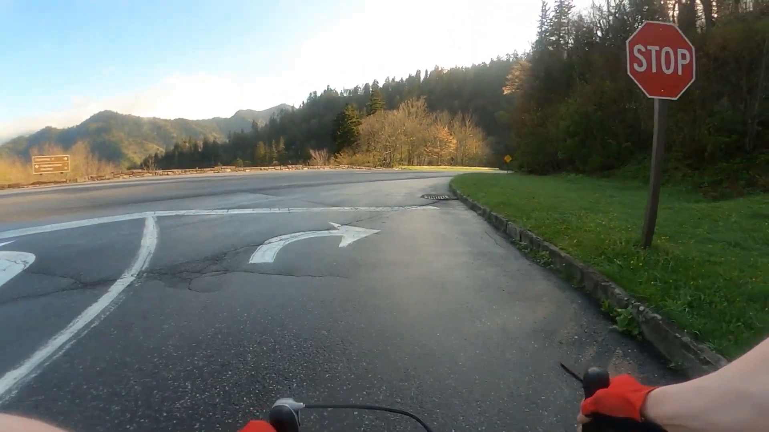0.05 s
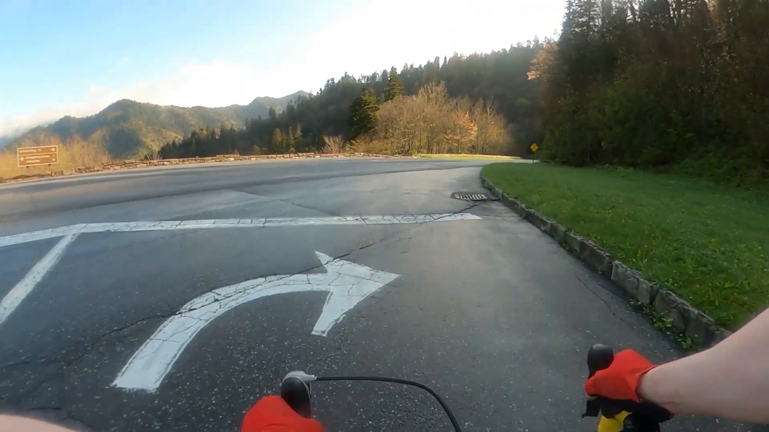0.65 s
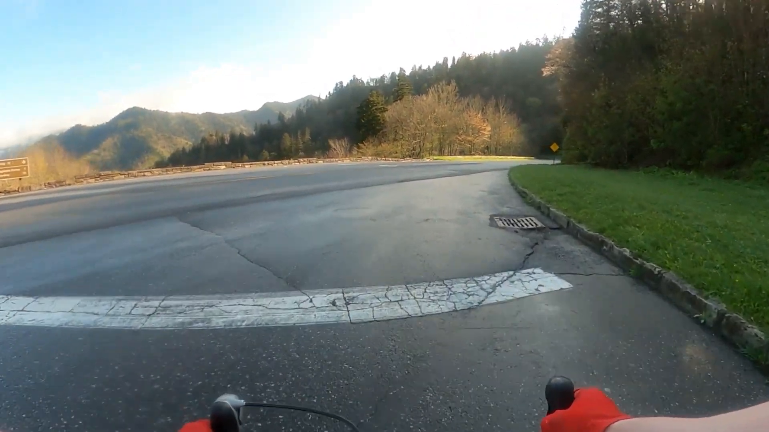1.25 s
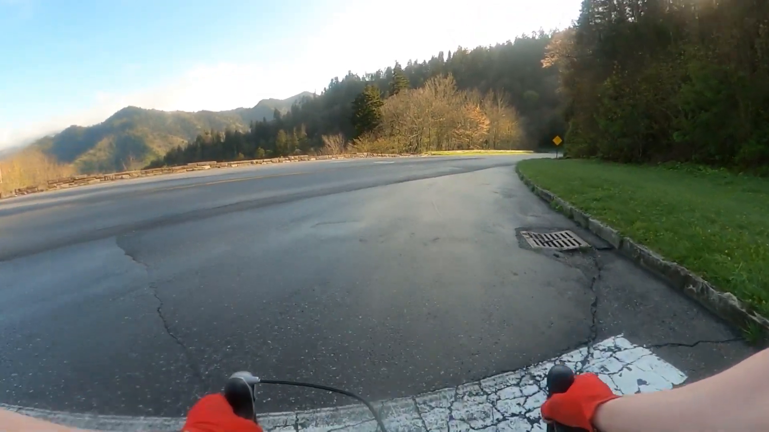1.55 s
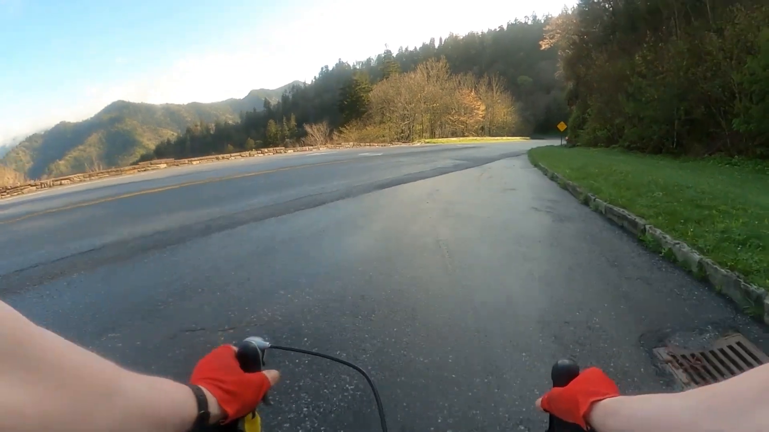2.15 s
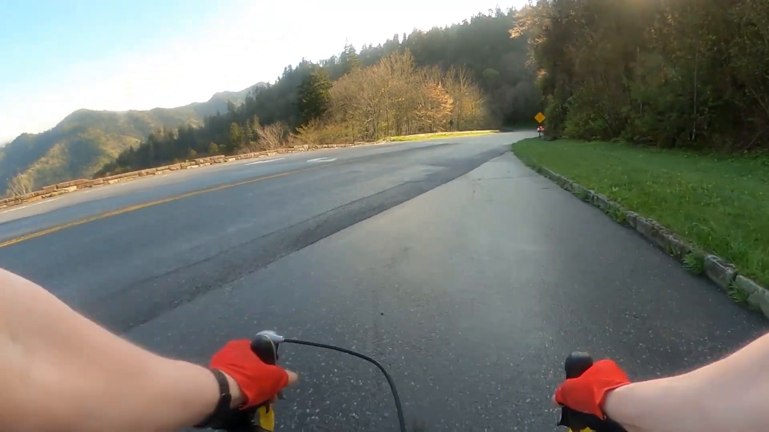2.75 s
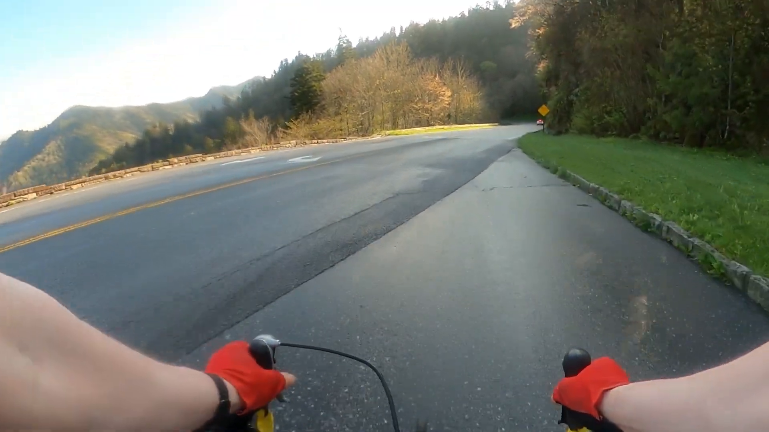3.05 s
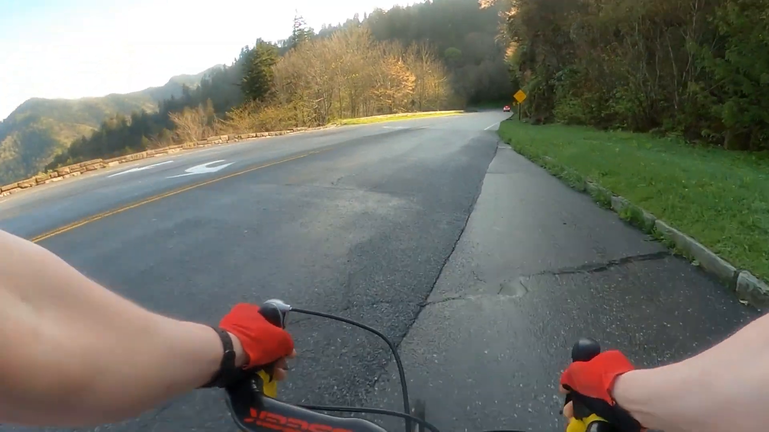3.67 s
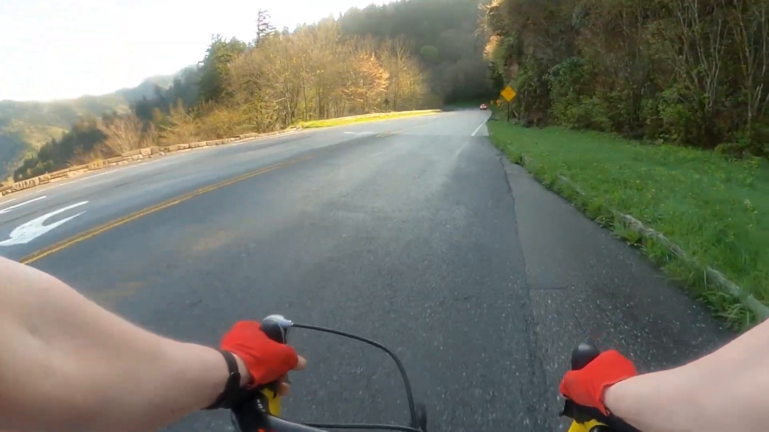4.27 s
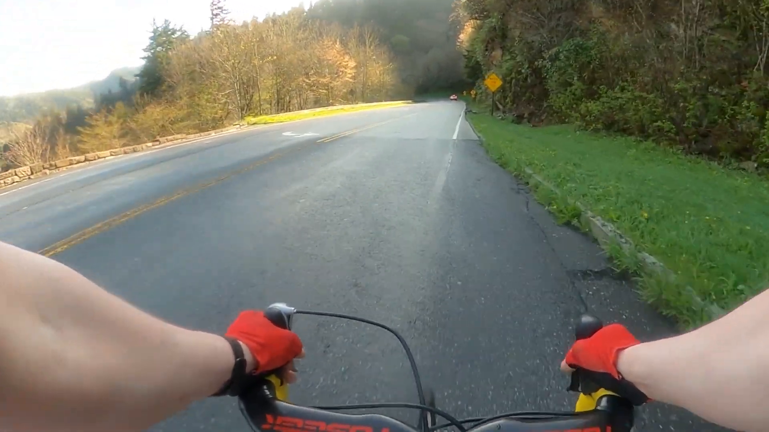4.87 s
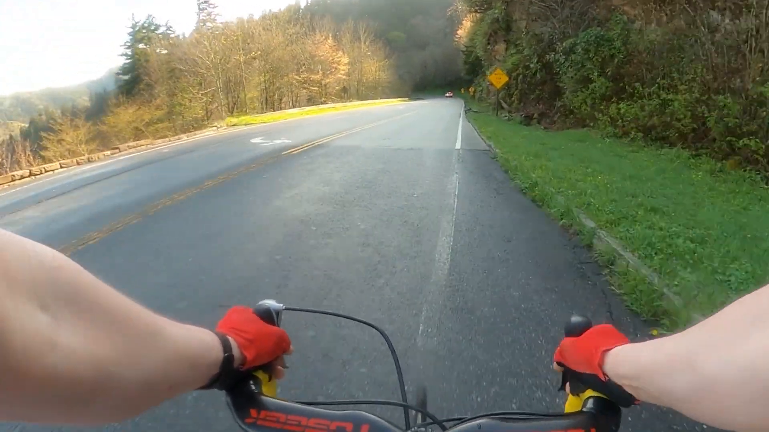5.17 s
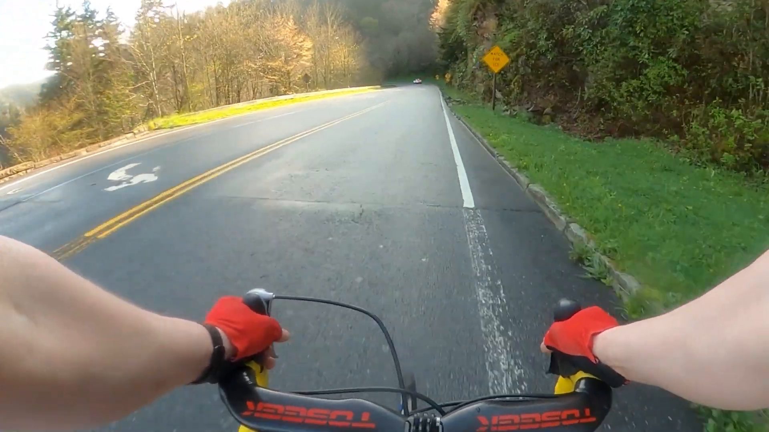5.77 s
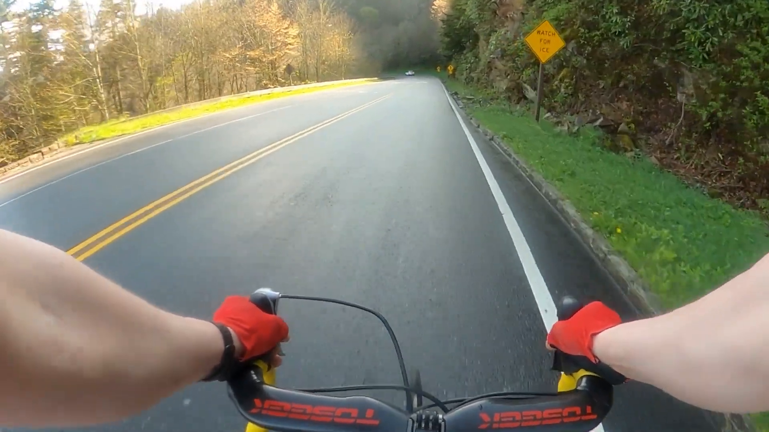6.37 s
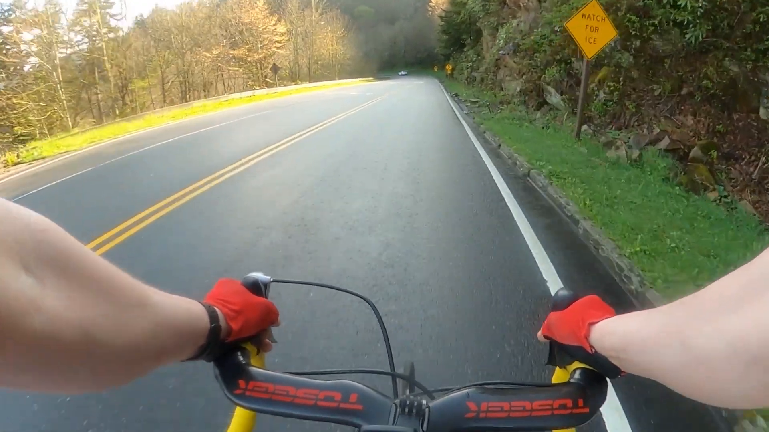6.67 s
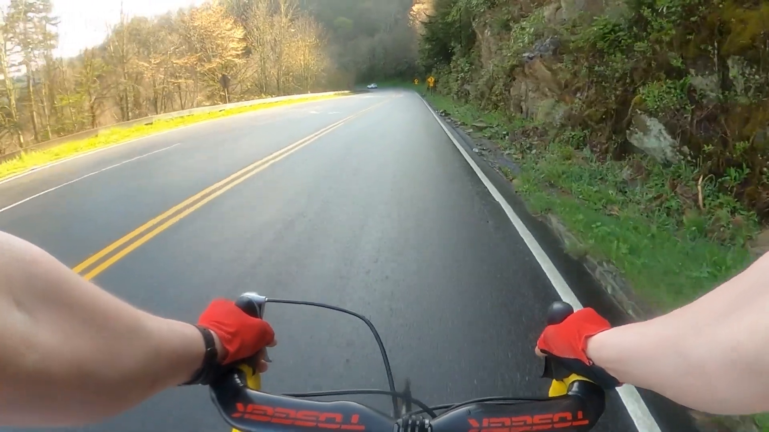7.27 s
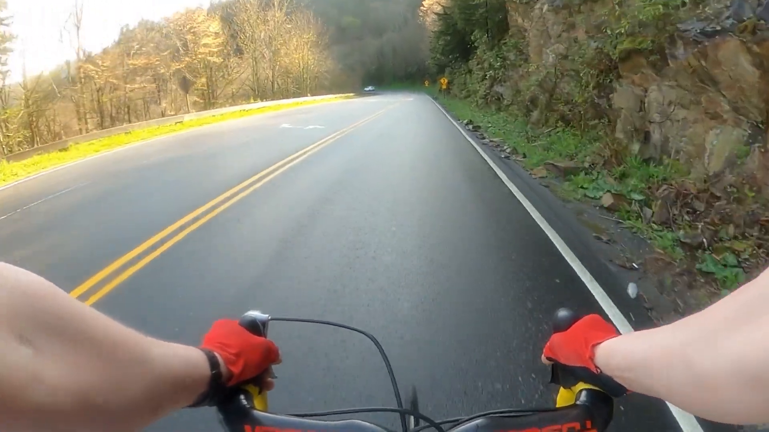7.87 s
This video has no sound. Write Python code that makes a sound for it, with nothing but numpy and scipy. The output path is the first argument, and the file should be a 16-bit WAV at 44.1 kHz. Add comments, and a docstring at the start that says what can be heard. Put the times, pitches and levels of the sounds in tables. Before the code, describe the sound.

A microphone on a cyclist's chest picks up gusty, rumbling wind that grows stronger down a wooded road. At first a small bird trills faintly, the freewheel buzzes quietly and the wheels bump softly over cracks. Two gear changes follow around the middle, with crisp lever clicks and chain knocks. The faster final stretch brings louder rushing air, wet tyre hiss and faint, scattered ticks.

```python
"""A road bicycle going downhill

A bicycle gathers speed on damp asphalt, heard at a two-port microphone on the rider's chest.
Eddies buffet the ports and air rushes past the housing; the tyres hum, roar and fling wet grit,
all growing with speed. Early on a small bird trills in the woods and the freewheel buzzes.
The rider shifts with the left hand, then the right, and the chain clatters over."""
import sys
import numpy as np
from scipy import signal
from scipy.fft import rfft, irfft, next_fast_len
from scipy.io import wavfile
from scipy.ndimage import uniform_filter1d

SR = 44100
rng = np.random.default_rng(int(sys.argv[2]) if len(sys.argv) > 2 else 0)


def bounce(signal):
    """Save signal as a 16-bit WAV file at the path given by the first command-line argument."""
    frames = np.transpose(np.atleast_2d(signal))
    limited = np.clip(frames, -1, 1)
    pcm = np.round(limited * 32767).astype(np.int16)
    wavfile.write(sys.argv[1], SR, pcm)


N = 353682
TIME = np.arange(N) / SR

# Spectra of the noise sources. Each row: frequency in Hz, relative spectral density in dB.
BUFFET_SPECTRUM = [(8, -0.5), (25, 3.5), (65, -2), (100, -6), (150, -15.5), (220, -25.5), (400, -45.5),
                   (1000, -97)]
RUSH_SPECTRUM = [(30, 11.5), (120, -2), (220, 4.5), (310, 2.5), (700, -6), (1300, -8.5), (1900, -36.5),
                 (3300, -23.5), (5000, -55), (7500, -43), (10000, -85)]
ROAR_SPECTRUM = [(250, -35), (800, 12), (1500, 12.5), (2300, 5.5), (3600, -3.5), (5200, -9.5),
                 (8000, -15.5), (13000, -68)]
SPRAY_SPECTRUM = [(2000, 12), (3500, 12.5), (5500, -2), (6700, 7), (7800, 7), (8800, -0.5), (11000, -1),
                  (12000, -12), (13400, -9.5), (15000, -34)]
FOREST_SPECTRUM = [(100, -9), (225, 2.5), (300, -7), (400, -9), (700, -25.5), (1350, -40), (1700, -29),
                   (3500, -29.5), (7500, -38.5), (10000, -59.5)]
PAWL_SPECTRUM = [(1500, 8), (2700, -9), (3400, 5.5), (4000, 4), (4400, -7.5), (5000, 4), (6200, -8),
                 (8000, -28)]
SNAP_SPECTRUM = [(300, -17), (900, 12.5), (2000, 9), (3500, 10), (4700, 3), (5700, 1.5), (7000, 5.5),
                 (9000, -4), (13000, -11.5), (15000, -32)]
# How far the two ports differ. Each row: frequency in Hz, side level relative to mid in dB.
PORT_DIFFERENCE = [(25, -10), (70, -10.5), (130, -7), (190, -11.5), (300, -26.5), (600, -69), (1000, -25.5),
                   (2000, -3.5), (4000, -5), (8000, -1.5), (13000, 4)]
# Cavity resonances of the housing. Each row: frequency in Hz, width in Hz, lift in dB.
HOUSING_CAVITIES = [(431.5, 81, 5.5), (587, 100, 6.5), (850.5, 97, 7), (1320, 53, 1.5), (3540, 830, 1)]
# The bicycle's motion. Each row: time in seconds, speed in m/s.
ROAD_SPEED = [(0, 4.15), (.6, 4.48), (1.55, 5.17), (1.9, 6.02), (3.3, 6.6), (4.1, 8.05), (5.3, 9.66),
              (6.4, 8.62), (8.02, 9.3)]
# Gusts and lulls in the headwind. Each row: start in seconds, length in seconds, change in dB.
HEADWIND_GUSTS = [(0.124, 0.048, 2.5), (.33, 0.058, -4.5), (0.67, 0.028, 11), (0.812, 0.092, 11),
                  (0.994, 0.14, 6.5), (1.39, 0.039, 4), (1.488, 0.24, -4), (1.796, 0.035, 1.5),
                  (1.945, 0.1, 8), (2.13, 0.038, 1.5), (2.452, 0.065, -6), (2.66, .12, 8), (2.84, 0.11, 5),
                  (2.981, 0.068, 9), (3.916, 0.063, 5), (4.2, 0.15, 4.5), (4.507, .11, -5.5),
                  (4.668, 0.054, -0.5), (4.77, 0.059, -4), (5.55, 0.061, 1.5), (5.667, 0.14, -3),
                  (6.069, 0.07, 9), (6.21, 0.2, 7), (6.48, .15, 7), (6.845, .07, 6), (7.17, 0.038, 5),
                  (7.344, 0.078, -4.5), (7.454, 0.041, 8.5), (7.643, 0.11, 9)]
# Coarseness and wetness of the road. Each row: time in seconds, extra roar in dB, extra spray in dB.
ROAD_SURFACE = [(3.3, 6.5, 7), (3.75, 10.5, 13), (4.2, 12, 3.5), (4.7, 16, 4.5), (5.25, 13.5, 5),
                (5.65, 11, 3.5), (6.4, 9.5, 9), (7.4, 11, 9), (8.02, 7.5, 8)]
# Impacts of grit, chain and wheels.
# Each row: start in seconds, relative peak in dB, pitch in Hz, rasp relative to the resonance in dB.
GRIT_TICKS = [(0.1373, -40, 5600, -10), (1.8199, -41, 5000, -10), (1.937, -44, 4800, -13),
              (2.0652, -45, 5660, -3), (3.679, -39, 7620, -13), (3.956, -41, 7200, 1),
              (3.974, -40, 7250, -3), (3.989, -45, 6300, -1), (4.0577, -43, 7400, 1),
              (4.1405, -48, 5300, 0), (4.151, -45, 7600, -8), (4.1774, -42, 7400, 2),
              (4.2765, -38, 7590, -11), (4.47, -40, 7400, 0), (4.55, -39, 7400, 4), (4.8603, -37, 7500, -6),
              (5.6505, -39, 7790, -7), (5.7687, -34, 7200, -4), (6.2042, -40, 5030, 5),
              (6.2621, -36, 7710, -10), (6.4881, -34, 7400, -13), (6.5455, -44, 7500, -2),
              (6.56, -39, 7750, 0), (6.6123, -45, 6210, -6), (6.6772, -42, 7630, -2),
              (6.7081, -35, 7430, 3), (6.7475, -38, 7120, 5), (6.948, -31.5, 7600, -3),
              (6.961, -36, 5400, 5), (7.0792, -45, 6660, -4), (7.1122, -39, 7590, -2),
              (7.2474, -45, 5540, 4), (7.2868, -34, 8200, 2), (7.3621, -37, 7740, 4),
              (7.4868, -35, 7450, 5), (7.503, -40, 6000, 4), (7.6225, -41, 8070, -3),
              (7.6514, -37, 8200, 0), (7.7682, -40, 7200, -5)]
CHAIN_KNOCKS = [(.300, -28, 950, -12), (.305, -32, 620, -11), (.326, -37.5, 1520, -4),
                (3.661, -33, 1710, -4), (3.927, -20, 560, -7), (3.952, -21, 830, -7),
                (3.956, -28, 2400, -3), (3.969, -22, 566, -8), (3.984, -22.5, 524, -10),
                (4.031, -31, 2000, -3), (4.141, -22, 850, -6), (5.077, -28, 4200, -1),
                (5.081, -22, 850, -6), (5.383, -23, 2100, -2), (5.386, -14, 610, -14),
                (5.390, -16.5, 920, -10), (5.398, -20, 640, -11)]
WHEEL_BUMPS = [(1.79, -27, 243, -14), (1.85, -28, 230, -19), (2.2, -33, 219.8, -25), (3.945, -24, 241, -15),
               (3.985, -23.5, 259, -15)]
# The bird's trill. Each entry: relative level of one note in dB.
TRILL_LEVELS = [-60, -60, -56.5, -63, -55.5, -61.5, -56, -57.5, -60.5, -61, -58, -63]
# Spells of coasting. Each row: start in seconds, length in seconds, relative level in dB.
COASTING_SPELLS = [(0.775, 0.36, -59), (1.15, 0.92, -66), (2.52, 1, -68.5)]
# Clicks of the shift levers. Each row: start in seconds, ring, thud and snap levels in dB,
# hand (0 left, 1 right), frequency in Hz above which the ring dulls.
LEVER_CLICKS = [(3.590, -25, -32, -31, 0, 2900), (3.7152, -50, -50, -39, 0, 8000),
                (3.7335, -31, -31, -32, 0, 3000), (3.741, -21.5, -18, -19, 0, 8000),
                (3.7455, -37, -30, -27, 0, 8000), (3.753, -40, -38, -33, 0, 8000),
                (4.022, -37, -33, -28, 0, 3000), (4.032, -39, -38, -34.5, 0, 3000),
                (5.0645, -30.5, -30, -28, 1, 2700), (5.069, -25, -25, -24, 1, 4000),
                (5.1955, -30.5, -40, -30, 1, 2700), (5.2335, -25.5, -28, -18, 1, 8000),
                (5.241, -38, -32, -30, 1, 8000)]
# Modes of the levers. Each row: frequency in Hz, relative level in dB, time to fall 60 dB in seconds.
LEFT_LEVER_MODES = [(430, -1, .028), (590, -1, 0.03), (1430, -7, .02), (1585, 1.5, 0.03), (1720, -3, 0.024),
                    (2470, -9, 0.02), (2780, -5.5, 0.026), (3330, -5, .02), (3640, 0, 0.021),
                    (4870, -6, 0.024), (6150, -20, 0.022), (7390, -18, .016), (7817, -14, 0.02)]
RIGHT_LEVER_MODES = [(420, 0, .028), (800, 2, 0.028), (1140, -4, 0.016), (1530, 1, 0.016), (2020, -2, .016),
                     (2690, 0, 0.023), (3420, 5, .02), (3680, 1, 0.018), (4230, -5, 0.024),
                     (4660, -5, 0.018), (4980, -2, 0.022), (6050, -12, 0.022), (7400, -12, 0.022)]
# The chain singing under load. Each row: time in seconds, level in dB, resonance in Hz.
CHAIN_RESONANCE = [(4.1, -82, 3260), (4.24, -65, 3310), (4.55, -58, 3370), (4.85, -83, 3300),
                   (5.45, -68, 3370), (6.1, -70, 3390), (7.1, -68, 3400), (7.4, -60, 3430),
                   (8.02, -70, 3490)]


def undb(db):
    """Amplitude grows tenfold for every 20 dB."""
    return 10 ** (np.asarray(db) / 20)


def unit(x):
    """Normalisation to an rms of 1."""
    return x / np.sqrt(np.mean(x ** 2))


def even(x, span_s):
    """Division by the running rms levels a noise but keeps its quick flutter."""
    return x / np.sqrt(uniform_filter1d(np.mean(x ** 2, axis=0), int(span_s * SR)))


def curves(table):
    """Linear interpolation turns each column of a timed table into a curve."""
    times, *columns = np.transpose(table)
    return [np.interp(TIME, times, column) for column in columns]


def shape(x, spectrum, resonances=()):
    """Filtering multiplies the spectrum by a gain curve, here with a peak at each resonance."""
    size = next_fast_len(x.shape[-1])
    hz = np.fft.rfftfreq(size, 1 / SR) + 1
    points_hz, db = np.transpose(spectrum)
    gain_db = np.interp(np.log(hz), np.log(points_hz), db)
    for centre, width, lift in resonances:
        gain_db += lift / (1 + (2 * (hz - centre) / width) ** 2)
    return irfft(rfft(x, size) * undb(gain_db), size)[..., :x.shape[-1]]


def band(x, lo_hz, hi_hz):
    """A causal band-pass filter attenuates what lies outside its edges."""
    return signal.sosfilt(signal.butter(2, [lo_hz, hi_hz], "band", fs=SR, output="sos"), x)


def fade(t60, size=4096):
    """Exponential decay loses 60 dB every t60 seconds."""
    return np.exp(-np.log(1000) * TIME[:size] / t60)


def strike(t60, rise_s=.001):
    """A struck body's vibration builds quickly, then decays by damping."""
    return fade(t60) * (1 - np.exp(-(TIME[:4096] / rise_s) ** 2))


def swell(start_s, length_s, attack_s, release_s):
    """A trapezoidal envelope rises from 0 to 1, holds and falls back."""
    rise = np.clip((TIME - start_s) / attack_s, 0, 1)
    return rise * np.clip(1 - (TIME - start_s - length_s) / release_s, 0, 1)


def wander(rate_hz):
    """Random steps, smoothed twice, give a fluctuation of rms 1."""
    hold = int(SR / rate_hz)
    steps = np.repeat(rng.standard_normal(N // hold + 1), hold)
    return unit(uniform_filter1d(uniform_filter1d(steps, hold), hold)[:N])


def pulses(rate_hz, jitter, jitter_hz):
    """Nearly periodic contacts give a train of decaying pulses."""
    phase = np.cumsum(rate_hz * (1 + jitter * wander(jitter_hz))) / SR % 1
    return np.exp(-2 * phase)


def port_noise(size=N):
    """Noise at two close ports is coherent except for local eddies and short waves."""
    mid, side = rng.standard_normal((2, size))
    return mid + shape(side, PORT_DIFFERENCE) * np.array([[1], [-1]])


def speed_db(cruise_db, doubling_db, cruise_m_s=9):
    """A power law adds the same number of decibels for each doubling of speed."""
    speed, = curves(ROAD_SPEED)
    return cruise_db + doubling_db * np.log2(speed / cruise_m_s)


def add(out, start_s, sound):
    """Superposition: a sound adds to the mix from its start time."""
    i = int(start_s * SR)
    out[:, i:i + sound.shape[-1]] += sound[..., :N - i]


def impacts(table, t60, width, rise_s, rasp_t60, rasp_hz, gain_db):
    """Each impact excites one damped resonance and a broad rasp."""
    out = np.zeros((2, N))
    for start_s, db, hz, rasp_db in table:
        body = unit(band(port_noise(4096), hz / (1 + width), hz * (1 + width)) * strike(t60, rise_s))
        rasp = unit(band(port_noise(4096), *rasp_hz) * strike(rasp_t60, rise_s))
        knock = body + undb(rasp_db) * rasp
        add(out, start_s, knock / np.abs(knock).max() * undb(db + gain_db))
    return out


def wind(ragged_db=2.5, flutter_db=1.1, rush_gain_db=3, ceiling=.36):
    """Turbulence: eddies thump on the ports, and the passing stream rings the housing's cavities."""
    gust_db = sum(db * swell(start_s, length_s, attack_s=.027, release_s=.081)
                  for start_s, length_s, db in HEADWIND_GUSTS)
    eddies = even(shape(port_noise(), BUFFET_SPECTRUM) * undb(ragged_db * wander(28)), span_s=.16)
    buffet = eddies * undb(speed_db(-21.5, doubling_db=17.6) + gust_db)
    thumps = band(ceiling * np.tanh(buffet / ceiling), 6, 260)  # the hardest are rounded and stay dull
    rush = unit(shape(port_noise(), RUSH_SPECTRUM, HOUSING_CAVITIES) * undb(flutter_db * wander(45)))
    return thumps + rush * undb(speed_db(-38.5, doubling_db=14.46) + rush_gain_db)


def tyres(grains_per_s=150, grain_spread_db=4, gain_db=1.5):
    """Rolling noise: the tread roars on asphalt and flings spray, grittier where the road is wetter."""
    coarse_db, wet_db = curves(ROAD_SURFACE)
    roar = unit(shape(port_noise(), ROAR_SPECTRUM, HOUSING_CAVITIES) * undb(1.2 * wander(30)))
    roar *= undb(speed_db(-57.5, doubling_db=12.6) + coarse_db + gain_db)
    arrivals = rng.random(N) < grains_per_s / SR
    grains = arrivals * undb(grain_spread_db * np.minimum(rng.exponential(size=N), 3.5))
    # Each grain is a tiny noise burst; overlapping bursts add in power.
    bursts = np.sqrt(np.abs(signal.fftconvolve(grains ** 2, fade(t60=.01, size=512) ** 2)[:N]))
    grit = unit(band(shape(port_noise() * bursts, SPRAY_SPECTRUM), 5400, 12000))
    mist = unit(shape(port_noise(), SPRAY_SPECTRUM) * undb(.7 * wander(13)))
    spray = unit(mist + undb(-13 + .8 * wet_db) * grit)
    return roar + spray * undb(speed_db(-67.5, doubling_db=28) + wet_db + gain_db)


def tyre_hum(settled_hz=177.7, settle_m_s=6.1, hz_per_m_s=6, waver=.004, throb_db=1.1):
    """Periodic vibration of the rolling tyres gives a note that climbs with speed, then settles."""
    speed, = curves(ROAD_SPEED)
    hz = settled_hz - hz_per_m_s * np.maximum(settle_m_s - speed, 0)
    phase = 2 * np.pi * np.cumsum(hz * (1 + waver * wander(25.02))) / SR
    tone = unit(np.sin(phase) * undb(throb_db * wander(15)))
    lift_db = 10.6 * swell(start_s=.69, length_s=1.56, attack_s=.85, release_s=.44)
    return tone * undb(speed_db(-45, doubling_db=10.5) + lift_db)


def forest(base_db=-46, gain_db=-3, drift_db=1.5):
    """The distant rustle of the woods is broadband noise, coloured by the housing's resonances."""
    rustle = unit(shape(port_noise(), FOREST_SPECTRUM, HOUSING_CAVITIES))
    return rustle * undb(base_db + gain_db + drift_db * wander(.92))


def ticks(stray_count=26, stray_from_s=4.3):
    """Tiny impacts of grit and drivetrain ring high; faint ones fall at random on the wet road."""
    strays = [(rng.uniform(stray_from_s, N / SR), -45 + rng.uniform(-2.5, 2.5),
               rng.uniform(7000, 8200), -3) for _ in range(stray_count)]
    return impacts(GRIT_TICKS + strays, t60=.021, width=.074, rise_s=.00079,
                   rasp_t60=.012, rasp_hz=(4070, 9000), gain_db=-2.5)


def chain_clatter():
    """Knocks of chain and frame excite short resonances, each with a slower-decaying rasp."""
    return impacts(CHAIN_KNOCKS, t60=.038, width=.13, rise_s=.0013,
                   rasp_t60=.11, rasp_hz=(514, 2700), gain_db=-4)


def bird(first_s=.636, spacing_s=.1105, top_hz=5465, sag_hz_per_s=50, arch_hz=260, tremble_db=3):
    """Frequency-modulated whistles lengthen through a trill; reverberation in the trees smears them."""
    trill = np.zeros((2, N))
    quaver_hz = 45 * wander(500)
    for k, db in enumerate(TRILL_LEVELS):
        centre_s = first_s + k * spacing_s
        length_s = .07 * (1 + .05 * k)
        position = np.linspace(-1, 1, int(length_s * SR))
        peak_hz = top_hz - sag_hz_per_s * k * spacing_s + 15 * rng.standard_normal()
        hz = peak_hz - arch_hz * position ** 2 + quaver_hz[int(centre_s * SR):][:len(position)]
        whistle = np.sin(2 * np.pi * np.cumsum(hz) / SR) * np.cos(np.pi * position / 2) ** 2
        add(trill, centre_s - length_s / 2, whistle * undb(db))
    trill *= unit(undb(tremble_db * wander(130)))
    trees = port_noise(16384) * fade(t60=.9, size=16384)
    echoes = signal.fftconvolve(trill, trees / np.linalg.norm(trees[0]), axes=1)[:, :N]
    return trill + undb(-5) * echoes


def freewheel(pawl_hz=150, gain_db=2):
    """Pawls skipping over the ratchet make a train of bright rasps while the rider coasts."""
    coasting = sum(undb(db) * swell(start_s, length_s, attack_s=.024, release_s=.049)
                   for start_s, length_s, db in COASTING_SPELLS)
    rasps = pulses(pawl_hz, jitter=.14, jitter_hz=40) * port_noise()
    return unit(shape(rasps, PAWL_SPECTRUM)) * coasting * undb(gain_db + wander(25))


def wheel_bumps():
    """Cracks and seams strike the wheels and excite a low, broad resonance."""
    return impacts(WHEEL_BUMPS, t60=.19, width=.28, rise_s=.0033,
                   rasp_t60=.1, rasp_hz=(350, 900), gain_db=-4.5)


def shift_levers(rattle_db=-22):
    """A ratchet's snap is an impulse: it rings the lever's modes, thuds through the bar and rattles."""
    out = np.zeros((2, N))
    snap_envelope = strike(t60=.018) + undb(rattle_db) * strike(t60=.1)
    for start_s, ring_db, thud_db, snap_db, hand, dull_hz in LEVER_CLICKS:
        ring = np.zeros(4096)
        for hz, db, t60 in RIGHT_LEVER_MODES if hand else LEFT_LEVER_MODES:
            amplitude = undb(db) / np.hypot(1, (hz / dull_hz) ** 6)
            ring += amplitude * strike(t60) * np.sin(2 * np.pi * (hz * TIME[:4096] + rng.random()))
        thud = even(band(port_noise(4096), 230, 690), span_s=.005) * strike(t60=.018)
        snap = unit(shape(port_noise(4096), SNAP_SPECTRUM)) * snap_envelope
        add(out, start_s, undb(ring_db) * ring + undb(thud_db) * thud + undb(snap_db) * snap)
    return out


def chain_song(link_hz=76, width_hz=260, flicker_db=2, upper_hz=7650, upper_width=.044, upper_db=-9):
    """Links dropping onto the sprockets drive a resonance that drifts upward, and a fainter high one."""
    db, hz = curves(CHAIN_RESONANCE)
    links = pulses(link_hz, jitter=.05, jitter_hz=14) * port_noise() * undb(flicker_db * wander(30))
    # A moving band-pass: shift the resonance to 0 Hz, low-pass, and shift back.
    carrier = np.exp(2j * np.pi * np.cumsum(hz) / SR)
    lowpass = signal.butter(2, width_hz / 2, fs=SR, output="sos")
    ring = np.real(carrier * signal.sosfilt(lowpass, links / carrier))
    upper = band(links, upper_hz / (1 + upper_width), upper_hz * (1 + upper_width))
    return (unit(ring) + undb(upper_db) * unit(upper)) * undb(db)


def scene():
    """The pressures from wind, bicycle, bird and woods add at the two ports."""
    knocks = chain_clatter() + ticks() + wheel_bumps()
    motion = wind() + tyres() + tyre_hum()
    gears = freewheel() + chain_song() + shift_levers()
    return knocks + motion + gears + bird() + forest()


def record(dry, open_s=2.58, rise_s=.2, side_db=-11, widen_db_per_s=1.27, top_hz=14800):
    """Side gain sets stereo width: mono at first, it opens, then keeps widening; the top is cut off."""
    opening = np.clip((TIME - open_s) / rise_s, 0, 1)
    width = opening * undb(side_db + widen_db_per_s * (TIME - open_s))
    mid = dry.mean(axis=0)
    image = mid + width * (dry - mid)
    return signal.sosfilt(signal.ellip(8, .2, 70, top_hz, fs=SR, output="sos"), image)


dry = scene()
out = record(dry)
bounce(out)
```